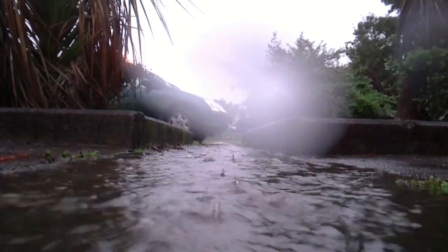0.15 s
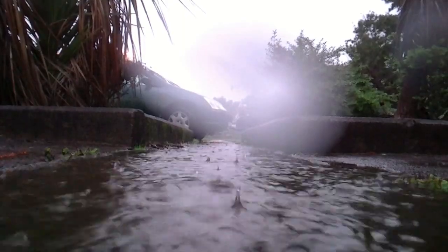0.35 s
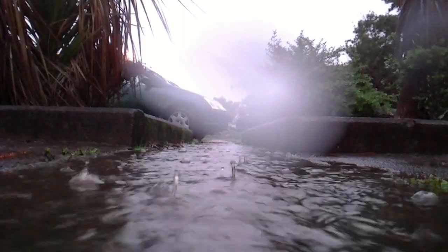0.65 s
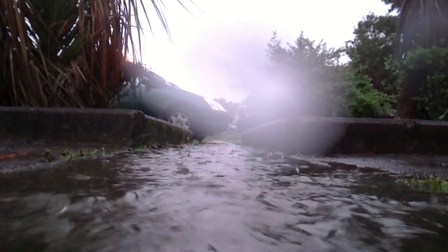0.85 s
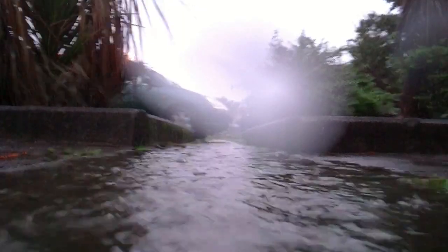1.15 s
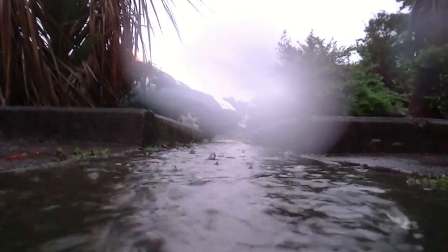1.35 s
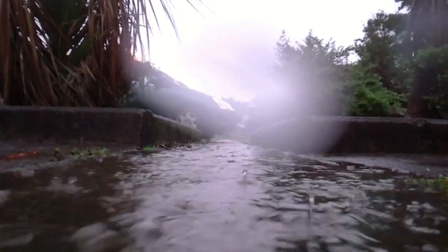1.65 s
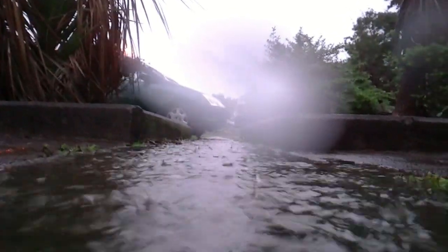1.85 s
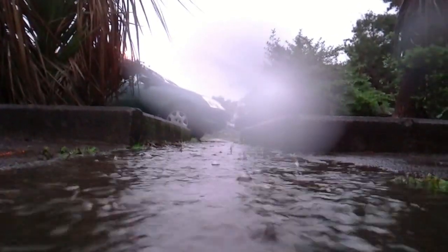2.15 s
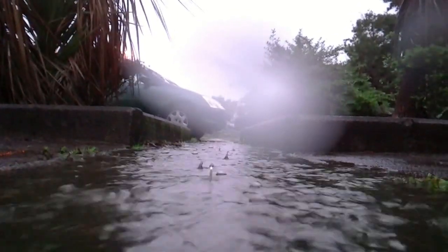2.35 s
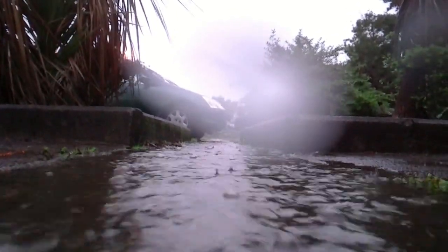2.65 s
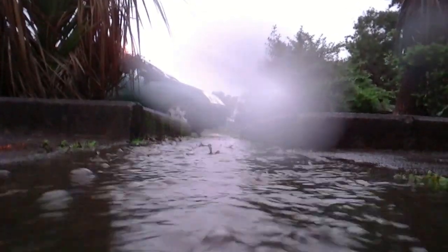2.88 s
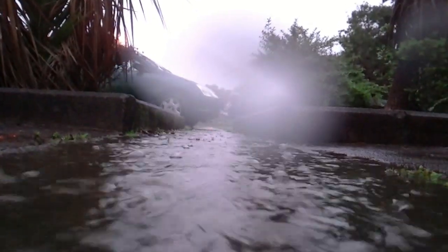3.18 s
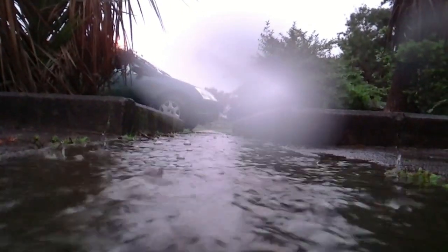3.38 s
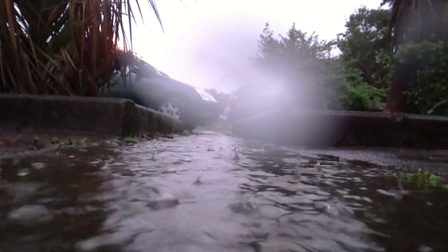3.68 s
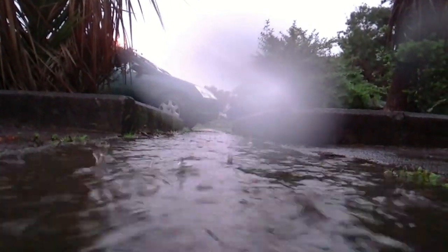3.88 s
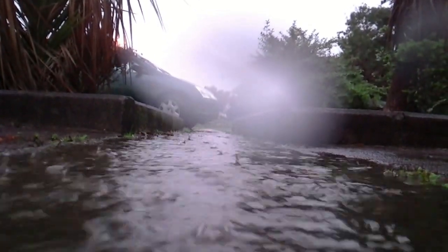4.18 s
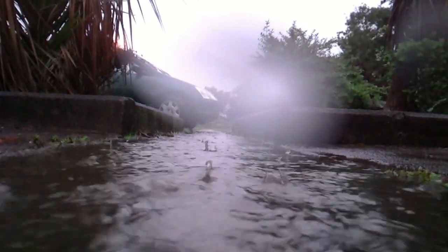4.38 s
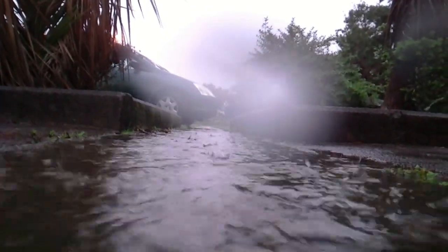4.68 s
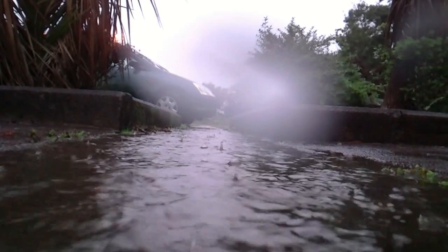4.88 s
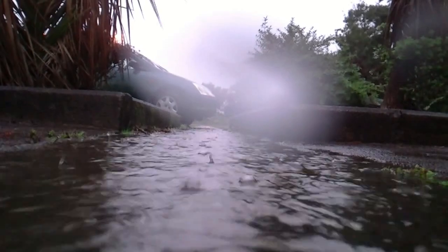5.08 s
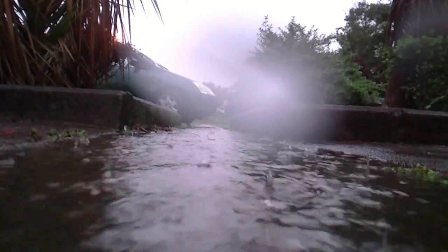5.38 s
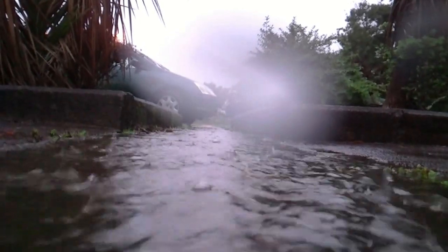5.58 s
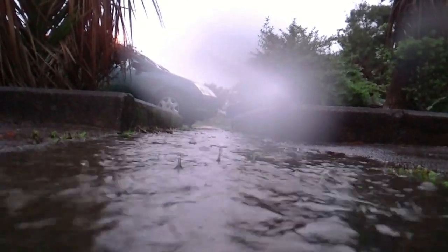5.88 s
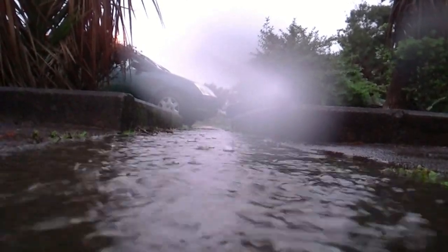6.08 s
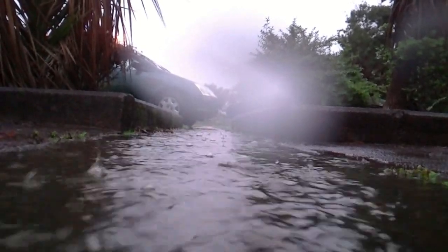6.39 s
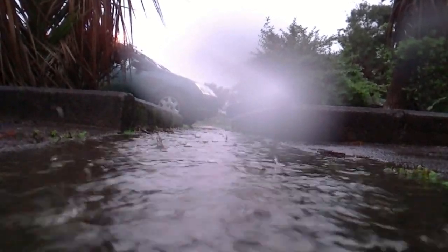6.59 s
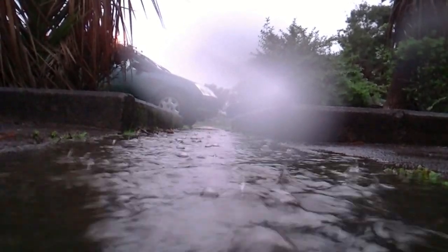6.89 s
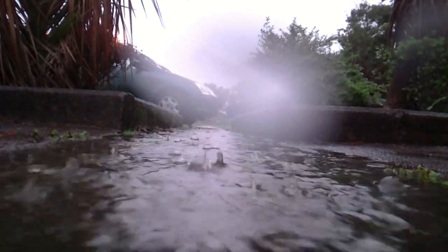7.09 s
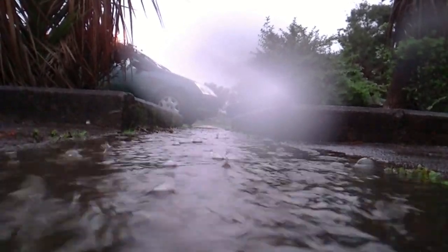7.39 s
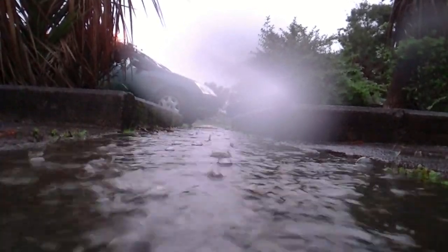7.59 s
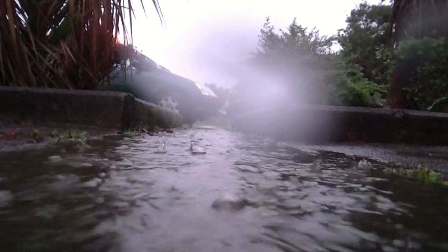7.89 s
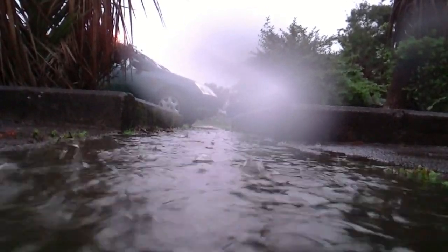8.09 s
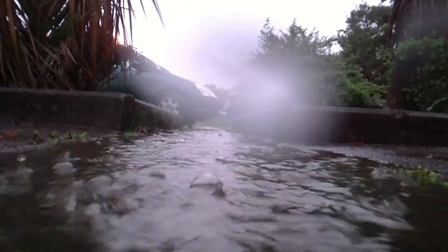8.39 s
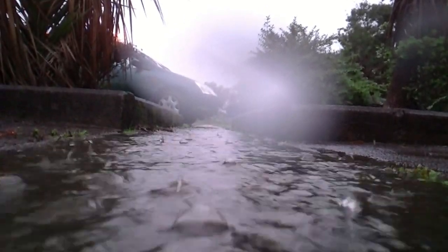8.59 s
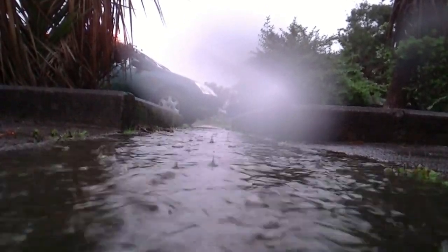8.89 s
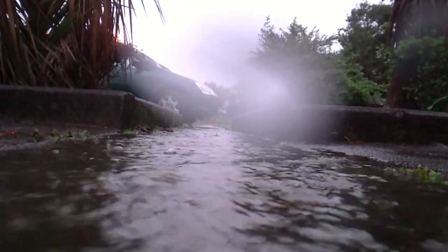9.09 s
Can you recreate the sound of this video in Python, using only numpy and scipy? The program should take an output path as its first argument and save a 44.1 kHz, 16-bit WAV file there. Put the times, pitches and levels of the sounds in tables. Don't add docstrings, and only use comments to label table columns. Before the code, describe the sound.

Irregular heavy rain heard from inside a sealed shell at water level outdoors. Dense knocking and bubbling fill the first three seconds, then it thins somewhat, with single plops and ticks over quiet rain hiss. Bright cracks hit the microphones near the middle and again later; the heaviest hollow knock falls near the end. Faint low water slaps and a thin distant bird warble are barely noticeable.

```python
import sys
import numpy as np
from scipy import signal
from scipy.fft import rfft, irfft, next_fast_len
from scipy.io import wavfile
from scipy.ndimage import uniform_filter1d, map_coordinates

SR = 44100
rng = np.random.default_rng(int(sys.argv[2]) if len(sys.argv) > 2 else 0)


def ratio_of_db(decibels):
    return 10 ** (np.asarray(decibels, float) / 20)


def wav_record(signal):
    frames = np.transpose(np.atleast_2d(signal))
    bounded = np.clip(frames, -1, 1)
    quanta = np.round(bounded * 32767).astype(np.int16)
    wavfile.write(sys.argv[1], SR, quanta)


N = 407925

# (centre [Hz], width [Hz], level [dB])
SHELL_MODES = [(369, 580, -7), (718.5, 201, -2.5)]
# (centre [Hz], width [Hz], level [dB])
LID_MODES = [(1130, 637, -1.5), (1480, 273, -7.5)]
# (centre [Hz], width [Hz], level [dB])
RIM_MODES = [(2200, 950, 6.5), (2800, 1200, -19.5), (4630, 6500, 1.5)]


def unit(x):
    return x / np.sqrt(np.mean(x ** 2) + 1e-20)


def along(points, hz):
    f, v = np.transpose(points)
    return np.interp(np.log(hz + 1), np.log(f + 1), v)


def filtered(x, response):
    m = next_fast_len(N + 8192)
    return irfft(rfft(x, m) * response(np.fft.rfftfreq(m, 1 / SR)), m)[..., :N]


def blows_at(s, db):
    return np.bincount(np.round(s * SR).astype(int), ratio_of_db(db), N + 1)[:N]


def rung(blows, modes):
    top_hz, low_hz = 1.2 * modes[-1][0], 0.5 * modes[0][0]

    def response(f):
        soft = 1j * f / (low_hz + 1j * f) / (1 + 1j * f / top_hz - (f / top_hz) ** 2) ** 1.375
        ring = 0
        for centre, width, db in modes:
            height = ratio_of_db(db) * SR / (np.pi * width)
            ring = ring + height * 1j * f * width / (centre ** 2 - f ** 2 + 1j * f * width)
        return soft * ring

    return filtered(blows, response)


def chirps(s, db, first_hz, last_hz, life, fall_db, attack, size, bend=1.04):
    t = np.arange(size) / SR
    age = t / life[:, None]
    phase = 2 * np.pi * t * (first_hz[:, None] + (last_hz - first_hz)[:, None] * age / 2)
    envelope = ratio_of_db(db[:, None] - fall_db * age ** bend) * (1 - np.exp(-t / attack))
    wave = envelope * np.sin(phase)
    at = np.round(s * SR).astype(int)[:, None] + np.arange(size)
    return np.bincount(at.ravel(), wave.ravel(), N + size)[:N]


def ports(x):
    # (frequency [Hz], left-right level [dB])
    port_lean = [(100, 3.5), (500, -1.5), (1440, 1.5), (1950, 0), (2600, 5.5), (4200, -0.5), (7000, 1.5)]
    # (frequency [Hz], lead of the left port [rad])
    port_lead = [(260, -1.6), (600, -0.4), (1550, 0.6), (1900, 1.9), (3600, 1.3), (5400, 0.43), (7200, 4.5)]

    def response(hz):
        half = ratio_of_db(along(port_lean, hz) / 2) * np.exp(0.5j * along(port_lead, hz))
        return np.array([half, 1 / half])

    return filtered(x, response)


def aside(sound, hz):
    spread_db, lag_s = 7, 1.2e-5
    lean_db = rng.normal(0, spread_db, len(hz)) / 2 * np.clip(hz / 2500, 0, 1) ** 2
    even_db = -20 * np.log10((ratio_of_db(lean_db) + ratio_of_db(-lean_db)) / 2)
    left = sound(even_db + lean_db, -lean_db * lag_s)
    right = sound(even_db - lean_db, lean_db * lag_s)
    return ports(np.array([left, right]))


def knocks():
    # (time [s], shell peak [dB], extra towards the lid [dB])
    on_back = [(.532, -15.5, -2.5), (0.777, -13, -1), (0.876, -26.5, 3), (0.991, -16, -16),
               (1.541, -22.5, 1), (1.641, -20, -2), (1.743, -11.5, -5), (1.775, -22.5, -3),
               (1.823, -20, -3), (1.829, -19, 4.5), (1.898, -14, 4), (2.391, -14, -1), (2.41, -23, 4),
               (2.477, -20, -3.5), (2.74, -14, -2), (2.837, -19.5, 3), (2.95, -21, -5), (3.569, -11, -0.5),
               (4.473, -22, 2.5), (4.853, -23.5, -2), (5.707, -23.5, 2), (6.885, -21.5, 3.5),
               (7.124, -21, 3), (7.481, -15, -0.5), (7.985, -7.5, -4), (8.027, -19, 1.5), (8.159, -21, 2),
               (8.439, -19.5, 2.5), (8.888, -17.5, -0.5)]
    # (time [s], shell peak [dB], extra towards the lid [dB])
    on_top = [(.715, -23, -2.5), (1.054, -24.5, -30), (1.099, -12.5, -2.5), (1.143, -26.5, 3),
              (1.233, -20, 0.5), (1.816, -21, -7), (1.842, -22.5, -1), (1.988, -19, -1.5),
              (2.048, -16.5, -4.5), (2.362, -16.5, -3.5), (2.374, -15, 0), (2.43, -19, 3),
              (2.457, -19.5, -0.5), (2.487, -15, 5), (2.731, -15, 0), (3.728, -17.5, 1), (4.01, -20, -1),
              (4.867, -12.5, -5), (5.005, -13.5, 0), (5.386, -16, -1), (5.699, -15, -1), (6.957, -17, -2.5),
              (7.49, -11.5, -3.5), (8.324, -19, 1), (8.771, -18.5, -3)]
    # (time [s], shell peak [dB])
    on_lid = [(.9, -17), (0.999, -28.5), (1.208, -30), (1.248, -22), (2.009, -23), (2.071, -28),
              (2.137, -27.5), (3.498, -17.5), (3.584, -30), (6.24, -20.5), (7.758, -25.5), (7.766, -16)]
    # (time [s], shell peak [dB])
    on_rim = [(0.508, -25.5), (.539, -23), (0.74, -22.5), (0.806, -22), (1.215, -21), (2.18, -24.5),
              (2.295, -24), (2.321, -23.5), (3.058, -20.5), (4.035, -25), (4.809, -22), (5.242, -29.5),
              (5.415, -17.5), (5.496, -32), (6.259, -23), (7.227, -22), (7.573, -25), (7.834, -22),
              (8.709, -25.5), (9.077, -21.5)]
    # (time [s], shell peak [dB])
    light_taps = [(0.179, -25.5), (0.526, -28), (0.796, -30), (1.069, -22), (1.155, -24), (1.177, -27),
                  (1.581, -29), (1.703, -21), (0.389, -29.5), (1.753, -23.5), (1.883, -28), (2.471, -24),
                  (2.597, -26.5), (2.711, -29), (3.035, -27), (3.655, -24.5), (3.972, -26.5), (4.589, -25),
                  (4.691, -27.5), (4.712, -29), (5.533, -26.5), (6.213, -25.5), (6.321, -24.5),
                  (6.436, -25.5), (6.97, -20), (7.901, -26), (8.073, -24.5), (8.175, -24.5), (8.314, -22)]
    # (time [s], shell peak [dB])
    dull_thuds = [(0.017, -26.5), (0.15, -30), (0.899, -16), (1.1848, -28), (1.306, -28.2), (1.5899, -27),
                  (1.7226, -28), (2.07, -27), (2.2938, -19.5), (4.535, -28.5), (5.493, -18),
                  (5.5817, -27.5), (5.6202, -26.5), (6.046, -26.5), (6.224, -27.5), (7.0747, -28),
                  (7.161, -29), (7.189, -30), (7.6757, -26.5), (7.7436, -28.5), (7.9305, -26),
                  (8.3241, -18), (9.0214, -26.5), (9.0758, -19.5)]
    # (lid over shell [dB], rim over shell [dB])
    part_reach = [
        (-1, -5.5),
        (4, 2.5),
        (10.5, 4),
        (10, 9.5),
        (1.5, -1),
        (1.5, -6),
    ]
    drops = []
    for place, (lid, rim) in zip([on_back, on_top, on_lid, on_rim, light_taps, dull_thuds], part_reach):
        for time, peak, *more in place:
            drops.append((time, peak, lid + sum(more), rim + sum(more) / 2))
    s, db, lid_db, rim_db = np.transpose(drops)

    dice = rng.uniform(0, 1, (len(s), 7)).T
    scatter_db = 3
    lid_db = lid_db + scatter_db * (2 * dice[5] - 1)
    rim_db = rim_db + scatter_db * (2 * dice[6] - 1)
    late_s, weaker_db = 0.001957 + 0.0078 * dice[:2], 14 + 9 * dice[2:4]

    def splash(level_db):
        droplets = blows_at((s + late_s).ravel(), (db + level_db - weaker_db).ravel())
        return blows_at(s, db + level_db) + droplets

    film_hz = 1870 + 1100 * dice[4]

    def film_chirp(lean_db, lag_s):
        film_db = db + rim_db + lean_db - 3.5
        return chirps(s + lag_s, film_db, film_hz, 1.1 * film_hz, 7 / film_hz, 8.7, 0.00012, size=500)

    film = aside(film_chirp, film_hz)
    wet = dice[4] > 0.5
    shell = rung(splash(2.8 - 99 * wet), SHELL_MODES * np.array([1.07, 1, 1]))
    shell += rung(splash(2.8 - 99 * ~wet), SHELL_MODES * np.array([0.93, 1, 1]))
    lid = rung(splash(lid_db + 2.5), LID_MODES)
    rim = rung(splash(rim_db - 11.0), RIM_MODES)
    return ports(shell + lid + rim) + film


def bubbles():
    # (time [s], peak [dB], first pitch [Hz], life [s])
    rising = [(.878, -17.5, 1750, 0.0068), (1.0, -11.5, 1204, 0.015), (1.055, -11.5, 1375, 0.012),
              (1.798, -28.5, 1480, 0.019), (1.818, -22, 1356, 0.04), (1.864, -25, 1300, 0.02),
              (1.885, -21.5, 1310, 0.0098), (1.9, -16, 1196, 0.016), (1.916, -31, 1480, 0.02),
              (2.137, -8.5, 1357, 0.011), (2.419, -22, 1370, 0.0081), (3.573, -9.5, 1120, 0.0075),
              (3.585, -15, 1183, 0.0075), (4.55, -27.5, 1240, 0.015), (5.244, -8.5, 1302, 0.0068),
              (7.574, -20, 1400, 0.018), (7.866, -21, 1236, 0.024), (8.154, -23.5, 1345, 0.013)]
    # (time [s], peak [dB], first pitch [Hz], life [s])
    resting = [(.001, -12, 1480, 0.0061), (.245, -33.5, 1930, 0.036), (.322, -25.5, 1980, 0.0099),
               (.783, -21, 2800, 0.0058), (.991, -22, 1147, 0.013), (.996, -13.5, 1170, 0.006),
               (1.143, -16.5, 2710, 0.0057), (1.186, -21, 2550, 0.0072), (1.207, -16.5, 1490, 0.01),
               (1.212, -15, 2250, 0.013), (1.614, -29.5, 1580, 0.02), (1.645, -9, 3120, 0.0034),
               (1.744, -25, 2290, 0.0088), (1.844, -14, 1310, 0.02), (1.977, -23, 1490, 0.0094),
               (2.179, -11.5, 2700, 0.0054), (2.429, -16.5, 2570, 0.014), (2.536, -26.5, 2000, 0.0068),
               (3.044, -29, 1354, 0.034), (3.752, -27, 1620, 0.013), (4.035, -11, 2080, 0.0041),
               (4.233, -18, 1704, 0.0082), (5.178, -17, 2250, 0.0061), (5.26, -20.5, 1524, 0.0092),
               (6.226, -10.5, 1595, 0.018), (6.242, -16.5, 1520, 0.013), (6.928, -7, 2100, 0.0036),
               (7.491, -13.5, 1700, 0.01), (7.769, -8.5, 1480, 0.0067), (8.572, -29.5, 1430, 0.016)]
    # (time [s], peak [dB], first pitch [Hz], life [s])
    sinking = [(.509, -24, 2510, 0.015), (.54, -13.5, 2660, 0.0061), (.716, -27.5, 3330, 0.017),
               (.74, -15.5, 2300, 0.008), (.807, -14.5, 1572, 0.02), (1.234, -13.5, 2770, 0.011),
               (1.774, -27, 1540, 0.03), (1.844, -21, 2920, .013), (1.989, -18, 1543, 0.019),
               (2.071, -22, 2850, 0.011), (2.324, -25, 2540, 0.014), (2.457, -15, 2840, 0.0049),
               (3.059, -22.5, 1496, 0.0187), (4.068, -19.5, 1685, 0.015), (4.455, -23, 1970, 0.018),
               (4.971, -4, 2030, 0.003), (6.262, -24, 1960, 0.018), (6.291, -13.5, 1670, 0.015),
               (6.358, -23, 2800, 0.0145), (7.142, -26, 1303, 0.021), (7.776, -33, 1480, 0.029),
               (8.028, -21, 2850, 0.012)]
    # (time [s], peak [dB], pitch [Hz])
    faint = [(0.031, -32, 1490), (0.343, -34, 2470), (0.883, -31, 1320), (.485, -27, 2860),
             (.95, -29, 2230), (1.948, -35.5, 1400), (2.088, -36, 1310), (2.233, -33, 1360),
             (2.537, -32, 1450), (3.874, -37, 1990), (4.191, -32, 1820), (4.262, -28, 2040),
             (4.725, -33.5, 1430), (5.024, -34, 1440), (5.349, -35, 2220), (5.548, -34.5, 1630),
             (6.331, -30, 2650), (7.365, -29, 2940), (7.472, -24, 2620), (7.688, -31, 1550),
             (7.898, -32, 2480), (8.326, -24, 2180), (9.115, -35.5, 2030)]
    far = [(s, db, hz, 23 / hz) for s, db, hz in faint]
    kinds = [(rising, 1.13), (resting + far, 1.025), (sinking, 0.91)]
    rows = [(*bubble, glide) for kind, glide in kinds for bubble in kind]
    s, db, hz, life, glide = np.transpose(rows)

    def ring(lean_db, lag_s):
        peak_db = db + lean_db + 6.5
        return chirps(s + lag_s, peak_db, hz, glide * hz, life, 16.2, 0.00033, size=2200, bend=1.14)

    ringing = aside(ring, hz)
    ripples_db = 3 * map_coordinates(rng.standard_normal(N // 200 + 2), [np.arange(N) / 200])
    return ringing * ratio_of_db(ripples_db)


def small_drops(rows, late_s, ring_db, blow_db):
    s, db, hz = np.transpose(rows)

    def ring(lean_db, lag_s):
        at = s + late_s + lag_s
        return chirps(at, db + lean_db + ring_db, hz, 1.134 * hz, 9 / hz, 35.7, 0.0003, size=900)

    return aside(ring, hz) + ports(rung(blows_at(s + late_s, db + blow_db), RIM_MODES))


def splashes_and_taps():
    # (time [s], peak [dB], pitch [Hz])
    beside_lens = [(0.496, -16, 1480), (0.779, -13, 2740), (0.9375, -19, 2180), (0.9376, -22, 1140),
                   (1.645, -22, 1210), (2.064, -14, 1940), (2.372, -14, 2200), (2.792, -18.5, 1450),
                   (3.129, -20, 2030), (3.167, -13.5, 1820), (3.333, -15, 1850), (3.38, -18.5, 1590),
                   (3.467, -16, 1480), (3.595, -21, 2200), (4.363, -20, 3100), (4.648, -22, 1550),
                   (4.712, -20, 1075), (5.386, -12, 2760), (5.524, -17.5, 1400), (5.755, -17.5, 3200),
                   (6.032, -23, 1460), (6.076, -14.5, 1640), (6.188, -19, 2920), (6.356, -14.5, 1560),
                   (6.377, -16, 1600), (6.937, -19.5, 1420), (7.471, -18, 1500), (7.886, -13, 1360),
                   (8.608, -13.5, 1520), (9.077, -10, 2400)]
    # (time [s], peak [dB], pitch [Hz])
    fainter = [(0.676, -19.5, 1700), (0.7578, -24, 1200), (1.1853, -17.5, 1260), (1.3245, -22, 1470),
               (1.5734, -20, 1570), (2.1172, -19, 1620), (2.3342, -18.5, 1780), (3.971, -20.5, 1060),
               (4.5362, -21.5, 1750), (4.6634, -18.5, 1570), (4.837, -19.5, 1510), (5.0904, -18, 1760),
               (5.3708, -19.5, 1570), (5.4731, -18.5, 1480), (5.6467, -18, 2600), (5.6831, -21, 1530),
               (5.8672, -16.5, 1720), (5.9879, -16, 1850), (6.0582, -25, 1590), (6.6793, -19.5, 1640),
               (6.9806, -20.5, 1110), (7.019, -20, 1540), (7.1054, -22, 1640), (7.1867, -14.5, 1550),
               (7.3638, -20.5, 1490), (7.6746, -24, 1490), (7.932, -21.5, 1310), (8.2233, -19, 1470),
               (8.4204, -18, 1480), (8.6883, -18.5, 1330)]
    return small_drops(beside_lens, 0.0001, 8.5, -8.0) + small_drops(fainter, -0.00027, 5.4, -11.5)


def ticks(rows, late_s, ring_db, snap_db, cycles):
    # (frequency [Hz], level [dB])
    snap_colour = [(1500, -14), (3000, -0.5), (6500, 10), (7500, -18), (13500, -59), (16000, -56)]
    s, db, hz, pan_db = np.transpose(rows)
    rings, snaps = [], []
    for lean_db in (pan_db / 2, -pan_db / 2):
        ring_peak = db + lean_db + ring_db
        rings.append(chirps(s + late_s, ring_peak, hz, 1.014 * hz, cycles / hz, 15.4, 0.00013, size=300))
        snap_peak = db + lean_db + snap_db + 9 * np.log2(hz / 5500)
        snaps.append(blows_at(s + late_s + 0.00019, snap_peak))
    return np.array(rings) + filtered(np.array(snaps), lambda f: ratio_of_db(along(snap_colour, f)))


def spray():
    # (time [s], peak [dB], pitch [Hz], left-right level [dB])
    coarse = [(0.3673, -25.5, 4020, 2), (0.4252, -28, 4770, -8), (0.5357, -23, 5100, 9),
              (1.098, -33, 6150, -2), (1.325, -33, 6300, 3), (2.7288, -30, 5230, 13),
              (2.8293, -31.5, 6400, 4), (3.467, -28, 4330, 3), (3.729, -24, 4400, 12),
              (4.2188, -31, 6500, -1.0), (4.809, -21.5, 5370, 8), (5.1093, -17, 3580, 3),
              (5.1352, -23.5, 4200, 6), (5.9909, -28.5, 6300, 3), (6.221, -23.5, 4000, 2),
              (6.6008, -23, 3740, -2.5), (6.927, -25.5, 4040, -9), (7.673, -26, 3680, 4),
              (8.4203, -29, 6340, 5), (8.7083, -27.5, 5460, 6)]
    # (time [s], peak [dB], pitch [Hz], left-right
    # level [dB])
    more_droplets = [(0.2175, -28, 6460, 7), (0.2489, -21.5, 4240, 4), (0.8995, -22.5, 3460, 3),
                     (1.2472, -22, 4170, 1), (1.4407, -21.5, 4540, -4), (2.3347, -25, 5770, -9),
                     (2.6415, -20.5, 4170, -5), (2.9897, -25.5, 6200, 9), (3.8483, -20, 4200, 2),
                     (3.9715, -27.5, 6960, 15), (4.6639, -22, 3570, 5), (4.8669, -23, 5860, -4),
                     (5.0904, -24.5, 3800, 10), (5.3364, -14, 3830, 2), (5.6467, -26, 3760, 5),
                     (5.7095, -24, 5900, -1), (6.4359, -23.5, 4020, 9), (6.5845, -24, 4000, 15),
                     (6.9806, -24, 4860, -1), (7.1054, -29, 6550, 3), (7.8447, -25, 4800, 4),
                     (7.901, -22.5, 4680, -9), (8.2233, -22.5, 4900, 5), (8.6259, -21, 5810, 6),
                     (8.6888, -39, 6630, -43), (8.7416, -19, 5250, 5), (8.818, -26.5, 6050, -1),
                     (8.8883, -26, 5560, -1)]
    # (time [s], peak [dB], pitch [Hz], left-right level [dB])
    pins = [(0.2878, -34, 7260, 24), (1.2472, -31, 8100, 19), (2.2938, -29, 11200, 5),
            (2.3901, -26, 8300, 13), (2.7388, -33, 10700, 1), (2.7912, -31, 7900, 15),
            (2.9897, -35, 13600, -10), (3.9715, -33, 7850, 18), (5.079, -32, 8500, 9),
            (5.5229, -26.5, 8300, 21), (4.9706, -28, 13400, -9), (4.9738, -26, 12500, -11),
            (6.1869, -26.5, 8100, 4), (6.2583, -26, 7140, 10), (6.5202, -27, 11300, 8),
            (6.9367, -24, 8500, 9), (7.0409, -33, 12500, 1), (7.3891, -33, 13700, -9),
            (7.482, -31.5, 8500, 21.5), (7.8841, -32, 8300, 8), (8.571, -29, 8100, 11),
            (9.0764, -26.5, 7660, 14)]
    # (time [s], peak [dB], pitch [Hz], left-right level [dB])
    cracks = [
        (4.9714, -13.5, 6600, -3),
        (4.9743, -12, 4640, -12),
        (7.0419, -10.5, 5000, 0),
    ]
    sound = ticks(coarse, 0.0011, 10.9, 19.8, cycles=7.6)
    sound += ticks(more_droplets, -0.0002, 2.6, 13.8, cycles=12.0)
    sound += ticks(pins, 0.0005, 6.1, -8, cycles=7.3)
    return sound + ticks(cracks, 0, 4.1, 19, cycles=8.3)


def gulps():
    # (time [s], peak [dB])
    slaps = [
        (1.425, -33),
        (4.413, -29.5),
        (4.564, -31),
        (6.599, -33.5),
        (7.49, -35),
    ]
    s, db = np.transpose(slaps)
    hz = 190 * 2 ** rng.normal(0, 0.28, len(s))
    return ports(chirps(s, db, hz, 1.41 * hz, 1.8 / hz, 11, 0.0017, size=1500))


def patter(count, spread_db):
    s = rng.uniform(0, N / SR, count)
    drop_db = spread_db * np.minimum(rng.exponential(1, count), 1.9)

    def part(modes, db):
        return ratio_of_db(db) * rung(blows_at(s, drop_db + rng.uniform(-7.5, 4.7, count)), modes)

    return unit(ports(part(SHELL_MODES, 0) + part(LID_MODES, 2.2) + part(RIM_MODES, -0.72)))


def fizz(count, centre_hz, octaves, cycles, spread_db, size):
    s = rng.uniform(0, N / SR, count)
    db = spread_db * np.minimum(rng.exponential(1, count), 1.9)
    hz = np.clip(centre_hz * 2 ** rng.normal(0, octaves, count), 1350, 6500)
    pan_db = rng.normal(0, 15, count)

    def side(lean_db):
        return chirps(s, db + lean_db, hz, 1.07 * hz, cycles / hz, 14, 0.0005, size=size)

    return unit(np.array([side(pan_db / 2), side(-pan_db / 2)]))


def hiss(patchy_db):
    # (frequency [Hz], density [dB per Hz])
    rain_colour = [(60, -29), (270, -11), (690, -10.5), (960, -12.5), (1500, -6), (2200, -7), (3570, -5.5),
                   (5600, -8), (6700, -8), (7500, -27), (9000, -27), (11000, -29), (14000, -32.5),
                   (16500, -60)]
    # (frequency [Hz], likeness of the bed in both ports [0-1])
    likeness = [(60, 0.27), (900, 0.35), (3500, 1), (7000, 0.23)]
    z = signal.stft(rng.standard_normal((2, N)), nperseg=256)[2]
    patches = uniform_filter1d(rng.standard_normal(z.shape[1:]), size=5, axis=0)
    patches = uniform_filter1d(patches, size=4, axis=1)
    pair = signal.istft(z * ratio_of_db(patchy_db * unit(patches)), nperseg=256)[1][:, :N]

    def mid_side(hz):
        turn = np.arccos(np.clip(along(likeness, hz), 0, 1)) / 2
        return ratio_of_db(along(rain_colour, hz)) * np.array([np.cos(turn), np.sin(turn)])

    mid, side = filtered(pair, mid_side)
    return unit(ports(np.array([mid + side, mid - side])))


def gain_control():
    # (time [s], depth [dB])
    ducks = [(0.548, 10), (0.788, 5.5), (0.905, 12.5), (1.25, 5.5), (1.85, 2.5), (2.49, 7), (3.575, 4.5),
             (4.039, 8), (4.977, 4.5), (5.251, 5), (7.503, 12.5), (7.77, 5), (8.325, 5.5), (9.078, 12.5)]
    full_db, hold_s, recover_s = -37.5, 0.045, 0.073
    t = np.arange(N) / SR
    cuts = []
    for s, depth_db in ducks:
        recovery = np.exp(-np.clip(t - s - hold_s, 0, None) / recover_s)
        cuts.append((t > s) * depth_db * recovery)
    return ratio_of_db(full_db - uniform_filter1d(np.max(cuts, axis=0), size=200))


def bird():
    # (time [s], pitch [Hz], level [dB])
    phrase = [
        (0, 4500, -55),
        (.028, 3860, -48),
        (.05, 4400, -49),
        (.068, 4200, -43),
        (.09, 4550, -46),
        (.125, 3960, -46),
        (.16, 4000, -52),
    ]
    s, hz, db = np.transpose(phrase)
    t = np.arange(N) / SR
    flutter_db = 3 * map_coordinates(rng.standard_normal(1000), [t * 70])

    def sing(at):
        level = ratio_of_db(np.interp(t - at, s, db, -120, -120) + flutter_db)
        return level * np.sin(2 * np.pi * np.cumsum(np.interp(t - at, s, hz)) / SR)

    return ratio_of_db(4) * sing(0.578) + sing(3.343)


def scene():
    steady = ratio_of_db(0.96) * hiss(patchy_db=2.5)
    steady += ratio_of_db(-6) * patter(count=1100, spread_db=5)
    steady += ratio_of_db(-4.5) * fizz(3800, centre_hz=4465, octaves=0.41, cycles=2.54, spread_db=10.5, size=240)
    steady += ratio_of_db(-5.5) * fizz(900, centre_hz=1858, octaves=0.358, cycles=8.1, spread_db=-2.5, size=500)
    close = knocks() + bubbles() + splashes_and_taps() + spray() + gulps()
    return close + gain_control() * steady + bird()


def starve(x):
    # (frequency [Hz], score)
    threshold = [(7200, -9), (8200, -.7), (9600, .5), (10700, -.6), (11800, .7), (15600, 1.4), (16600, 4)]
    hz, _, z = signal.stft(x, SR, nperseg=2048)
    bright = uniform_filter1d(np.diff(x.sum(axis=0), 2, prepend=[0, 0]) ** 2, size=128)
    frames = np.resize(bright, (z.shape[2], 1024))
    attack = np.log(frames.max(axis=1) / np.median(frames, axis=1)) > 1.85
    chance = rng.standard_normal((z.shape[1] // 16 + 1, z.shape[2]))
    chance = chance.repeat(16, axis=0)[:z.shape[1]]
    score = 2.6 * attack - 0.4 + 0.7 * chance
    return signal.istft(z * (score > along(threshold, hz)[:, None]), SR, nperseg=2048)[1][:, :N]


def band_limit(x):
    return signal.sosfilt(signal.butter(12, 16550, fs=SR, output="sos"), x)


def record(dry):
    x = dry / (1 + np.abs(dry / 0.98) ** 6) ** (1 / 6)
    x = filtered(x, lambda hz: 1 / (1 + (hz / 15800) ** 40))
    mix = starve(x)
    return band_limit(mix)


dry = scene()
out = record(dry)
wav_record(out)
```